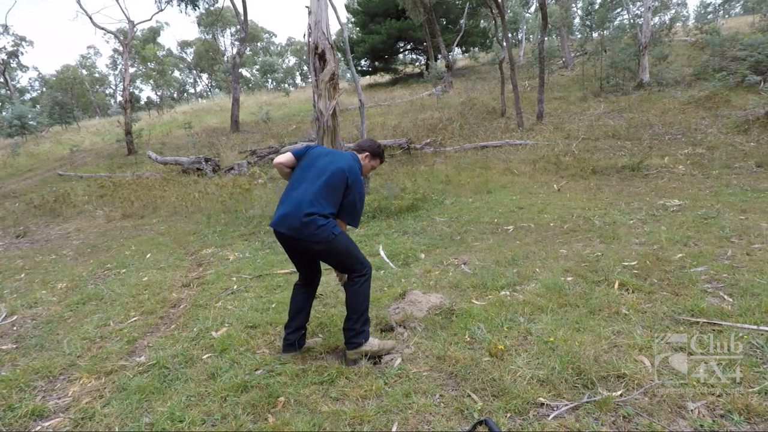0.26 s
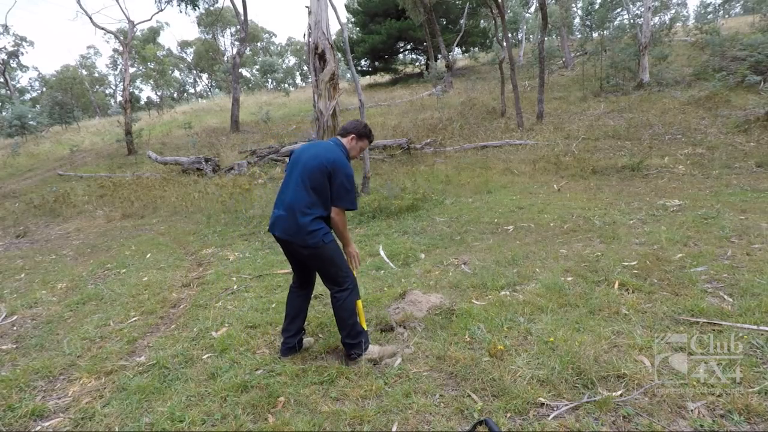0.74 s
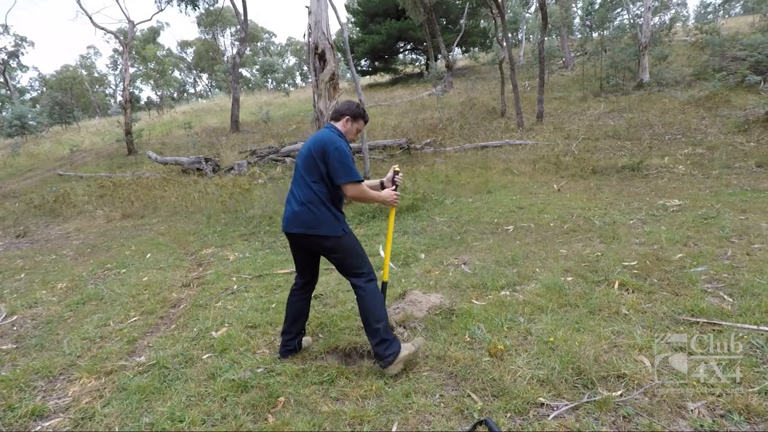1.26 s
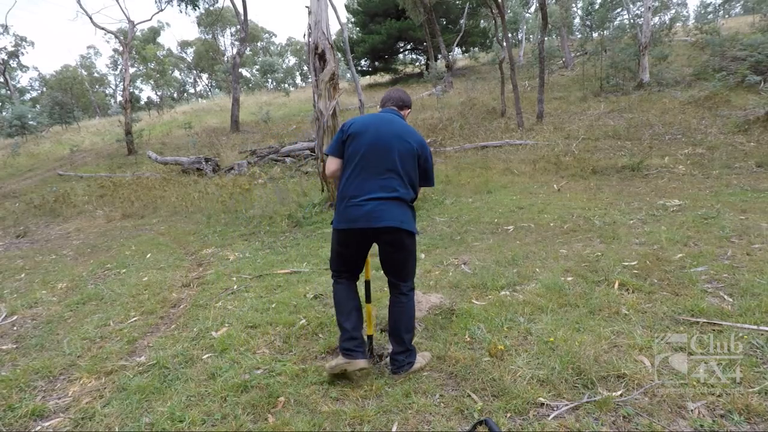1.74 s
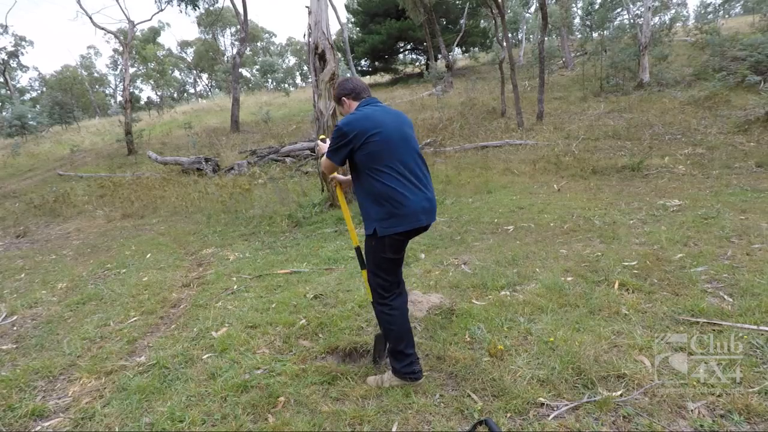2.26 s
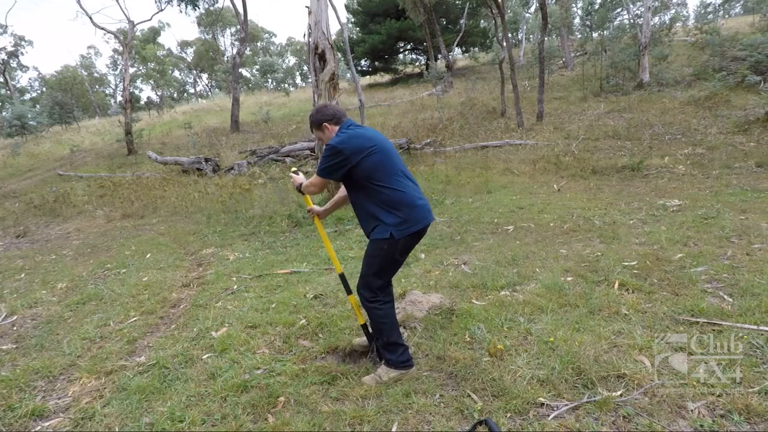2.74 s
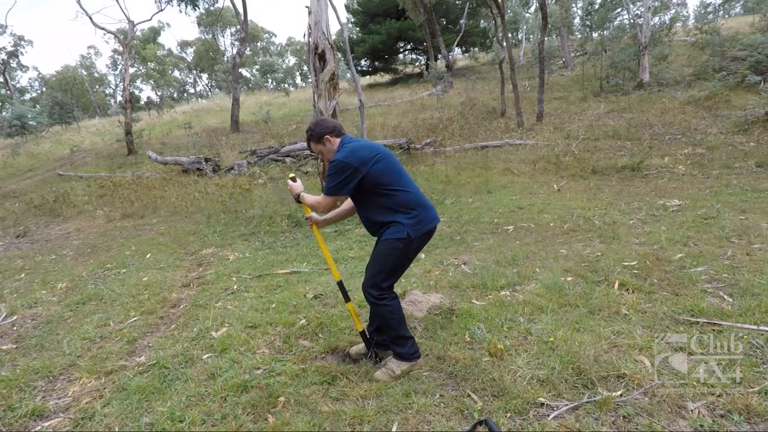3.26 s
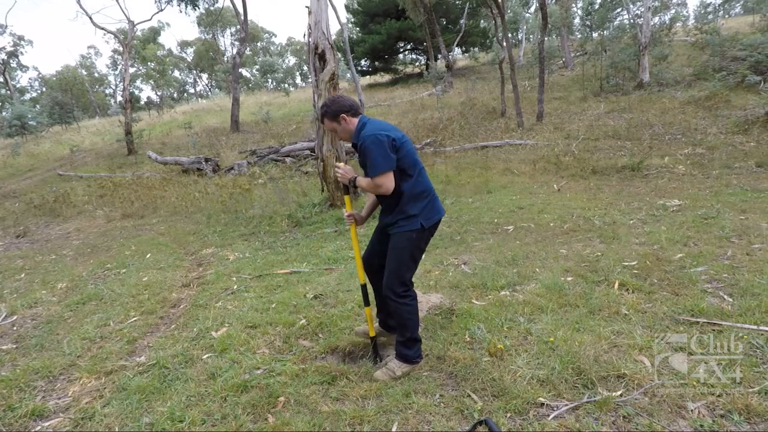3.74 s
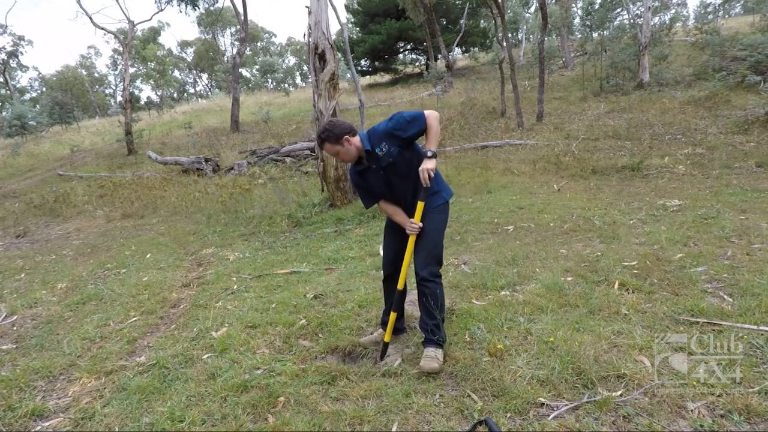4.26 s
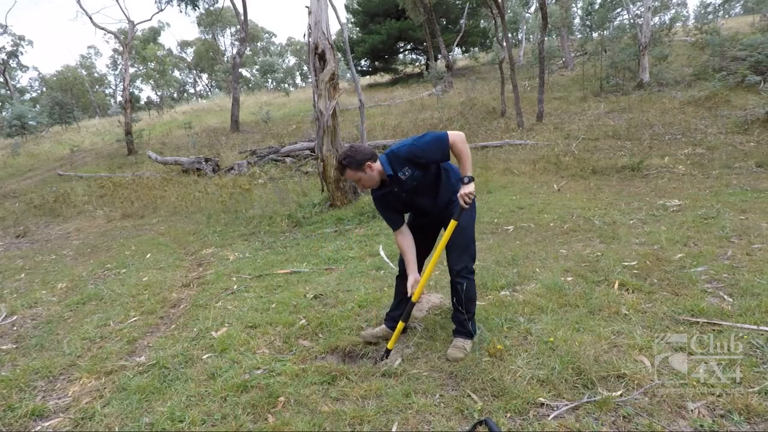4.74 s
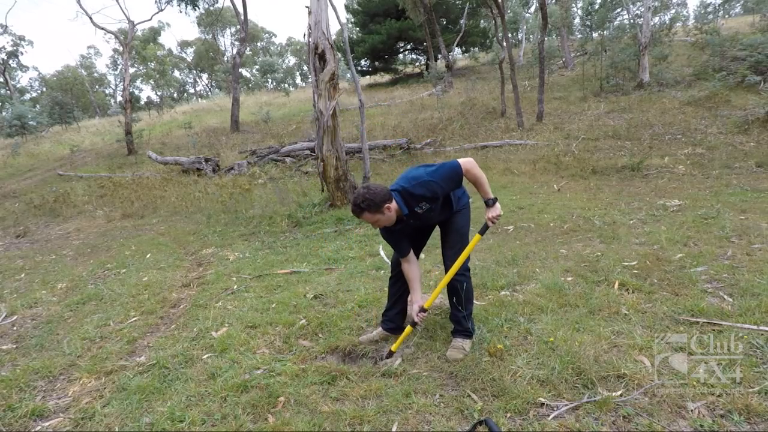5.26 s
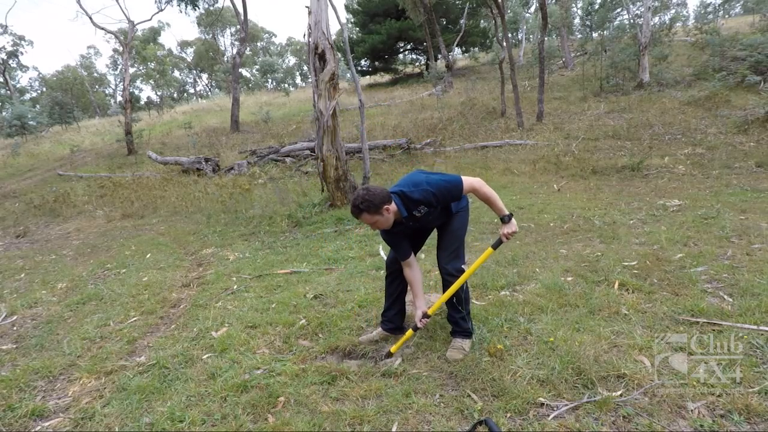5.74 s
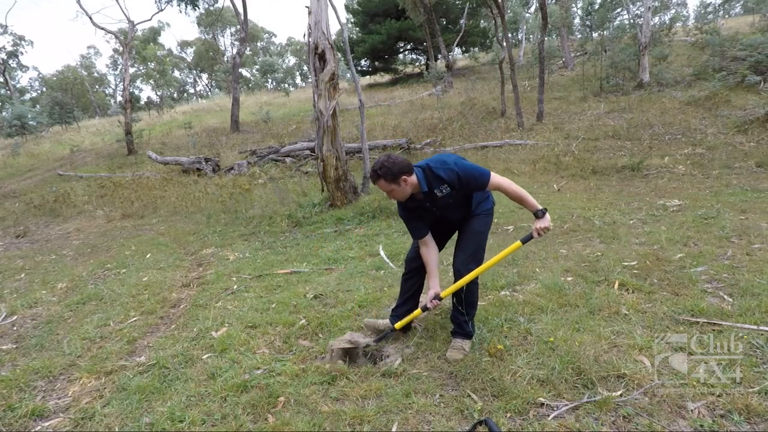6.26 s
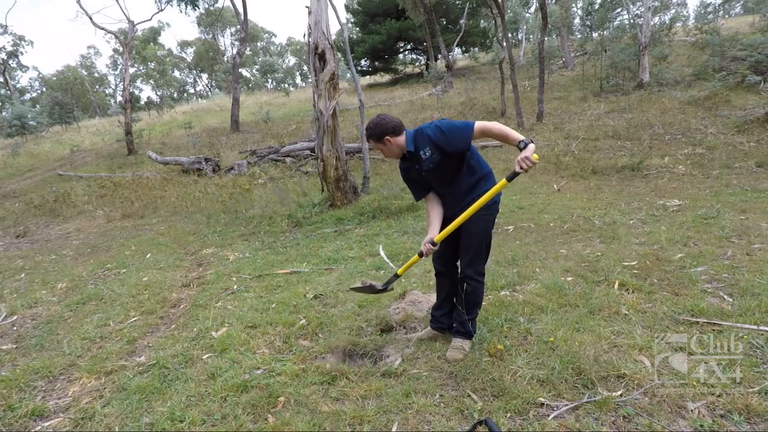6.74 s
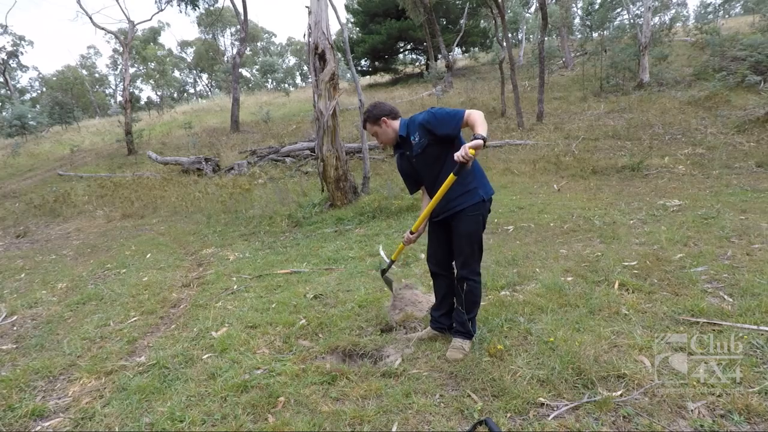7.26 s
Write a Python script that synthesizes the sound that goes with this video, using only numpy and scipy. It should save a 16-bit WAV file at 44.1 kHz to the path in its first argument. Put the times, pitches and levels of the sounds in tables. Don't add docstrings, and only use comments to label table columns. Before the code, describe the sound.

Outdoors, near the microphone, a boot drives a steel shovel into dry earth: crunch, knock and bright grit. Small stones tick on metal, the blade gives a short clean ring, and a dense crackling push follows. Later come isolated soft thuds, brushing stalks and dropping crumbs. Behind are steady air, a faint insect buzz, high whistled bird notes and a far low aircraft-like drone, with slight wind rumble.

```python
import sys
import numpy as np
from scipy import signal
from scipy.fft import rfft, irfft, next_fast_len
from scipy.io import wavfile
from scipy.ndimage import uniform_filter1d

SR = 44100
rng = np.random.default_rng(int(sys.argv[2]) if len(sys.argv) > 2 else 0)


def how_loud(loudness_db):
    steps = np.asarray(loudness_db, float) / 20
    return 10 ** steps


def transcribe(u):
    v = np.clip(np.atleast_2d(u).T, -1, 1)
    q = np.round(v * 32767).astype(np.int16)
    wavfile.write(sys.argv[1], SR, q)


N = 331191
SIZE = next_fast_len(N)
HZ = np.fft.rfftfreq(SIZE, 1 / SR)


def evened(x):
    return x / np.sqrt(np.mean(x ** 2) + 1e-20)


def read(points, hz, axis=1):
    columns = np.transpose(points)
    return np.interp(np.log(hz + 1), np.log(columns[0] + 1), columns[axis])


def follow(points):
    s, values = np.transpose(points)
    return np.interp(np.arange(N) / SR, s, values)


def add(mix, s, sound):
    part = mix[round(s * SR):][:len(sound)]
    part += sound[:len(part)]


def coloured(x, points):
    return evened(irfft(rfft(x, SIZE) * how_loud(read(points, HZ)), SIZE)[:N])


def band(x, lo_hz, hi_hz):
    return evened(signal.sosfilt(signal.butter(3, [lo_hz, hi_hz], "bandpass", fs=SR, output="sos"), x))


def resonate(x, hz, width):
    turn = np.exp(2j * np.pi * np.cumsum(hz * np.ones(len(x))) / SR)
    r = np.exp(-np.pi * width / SR)
    return 2 * (turn * signal.lfilter([1 - r], [1, -r], x / turn)).real


def grains(per_s, spread_db):
    size = how_loud(spread_db * np.minimum(rng.exponential(1, N), 4)) * rng.standard_normal(N)
    return evened(size * (rng.random(N) < per_s / SR))


def drift(per_s):
    span = round(SR / per_s)
    return evened(uniform_filter1d(uniform_filter1d(rng.standard_normal(N), span), span))


def patchy(x, depth_db):
    z = signal.stft(x, nperseg=256)[2]
    patches = rng.standard_normal(z.shape[::-1]).T
    patches = uniform_filter1d(uniform_filter1d(patches, size=5, axis=0), size=9, axis=1)
    return evened(signal.istft(z * how_loud(depth_db * evened(patches)), nperseg=256)[1][:N])


def strokes(table, roundness):
    s, db, swell, dying = np.transpose(table)[:4, :, None]
    late = np.arange(0, N, 64) / SR - s
    flank = np.where(late < 0, -late / np.maximum(swell, .005), late / np.maximum(dying, .005))
    return how_loud(db - 20 * np.minimum(flank, 50) ** roundness)


def summed(gains, rest_db):
    total = np.sqrt((gains ** 2).sum(0) + how_loud(rest_db) ** 2)
    return np.interp(np.arange(N), np.arange(0, N, 64), total)


def soft_pulse(db, hz, length, skew):
    t = np.arange(0, max(length, 1.5 / hz), 1 / SR)
    u = t / t[-1]
    peak_s = t[-1] * .5 ** (1 / skew)
    swell = np.sin(np.pi * u ** skew) ** 2
    return how_loud(db) * swell * np.cos(2 * np.pi * hz * (t - peak_s)), peak_s


def air():
    # (frequency [Hz], level [dB per Hz])
    wash_colour = [(65, -47.5), (110, -36), (132, -37), (162, -13), (180, -4), (225, -16.5), (392, -18),
                   (603, -19), (1050, -34), (1450, -34.5), (3890, -50.5), (6490, -49), (9780, -48.5),
                   (12200, -59.5), (14700, -73)]
    # (frequency [Hz], likeness [-1 to 1])
    likeness = [(60, 0.26), (180, 1), (540, 0.63), (1600, -0.62), (4780, 0.77), (14300, -0.53)]
    # (frequency [Hz], left minus right [dB])
    tilt = [(60, -0.5), (240, -1.5), (930, -3), (3640, 2), (14300, -6.5)]
    frames, hz = N // 256 + 5, np.fft.rfftfreq(1024, 1 / SR)
    a, b, c, d, patches = rng.standard_normal((frames, 513, 5)).T
    patches = evened(uniform_filter1d(uniform_filter1d(patches, 12, 0), 14, 1))
    same = np.clip(read(likeness, hz), -1, 1)[:, None]
    left = a + 1j * b
    right = same * left + np.sqrt(1 - same ** 2) * (c + 1j * d)
    side_db = np.array([.5, -.5])[:, None, None] * read(tilt, hz)[:, None]
    z = np.array([left, right]) * how_loud(read(wash_colour, hz)[:, None] + 0.29 * patches + side_db)
    return how_loud(-48.5) * evened(signal.istft(z, nperseg=1024, noverlap=768)[1][:, :N])


def insect():
    buzz = evened(resonate(rng.standard_normal(N), 3300 + 70 * drift(per_s=4), width=110))
    pulses = how_loud(3.0 * drift(per_s=30))
    return how_loud(-81) * buzz * pulses * np.clip(np.arange(N) / SR - 3.5, .3, 1.2)


def wind():
    # (time [s], level [dB])
    gust_level = [(0.0, -57), (0.14, -78), (1.5, -65), (3.0, -78.5), (7.51, -80)]
    gust = band(rng.standard_normal(N), 11, 90)
    own = band(rng.standard_normal(N), 45, 115)
    return how_loud(follow(gust_level)) * (gust + .3 * own * np.array([[1], [-1]]))


def drone():
    # (time [s], frequency [Hz])
    pitch = [(0, 164), (.2, 168.2), (.75, 167.9), (1.1, 165.4), (2.2, 165), (2.6, 161.5), (3.1, 160.2),
             (4.3, 160), (4.7, 157.6), (5.8, 157.4), (6.05, 155.1), (7.51, 154.4)]
    # (time [s], level [dB])
    loudness = [(0.0, -53), (0.35, -33), (0.52, -24.5), (0.575, -29.5), (0.615, -23), (0.73, -26),
                (1.12, -43), (2.16, -41.5), (2.6, -51), (2.96, -47), (3.14, -37), (3.8, -41), (3.87, -49),
                (4.39, -45), (4.58, -40.5), (4.984, -33.5), (5.49, -33.5), (5.8, -39), (6.3, -36),
                (7.51, -44.5)]
    # (time [s], level [dB])
    firing = [(0.0, -75.5), (1.0, -62), (2.3, -73.5), (3.0, -79), (3.5, -74), (5.2, -72), (5.8, -79),
              (6.5, -91), (7.0, -83), (7.51, -80)]
    hz, db, half_db = follow(pitch), follow(loudness), follow(firing)
    turns = np.cumsum(hz) / SR
    blur = evened(resonate(resonate(rng.standard_normal(N), hz, width=28), hz, width=21.0))
    tone = np.sqrt(2) * np.sin(2 * np.pi * turns) + 0.12 * blur
    half = np.sin(np.pi * turns) * how_loud(half_db)
    third = np.sin(3 * np.pi * turns) * how_loud((db + half_db) / 2 - 4.5)
    return tone * how_loud(db) + how_loud(-52.5) * blur + np.sqrt(2) * (half + third)


def bird():
    # (start [s], peak level [dB], middle frequency [Hz])
    notes = [(0.522, -63, 7940), (0.594, -66, 8000), (0.65, -65, 8020), (0.697, -67.5, 8150),
             (0.762, -64.5, 7900), (3.0717, -61, 7950), (3.1353, -61, 7820), (3.2071, -60, 7700),
             (5.2649, -59, 7620), (5.517, -58, 8600), (5.5744, -54.5, 8380), (5.6344, -55, 8220),
             (5.6885, -55, 8110), (5.7428, -55, 8000), (5.7844, -56, 7840), (5.8344, -55, 7840),
             (6.18, -63, 7950), (6.2494, -64, 8340), (6.32, -62, 8300), (6.402, -62, 8200),
             (6.4582, -65, 8000), (6.5, -65, 7900), (6.5545, -59, 7750)]
    out, u = np.zeros(N), np.linspace(0, 1, 1000)
    for s, db, hz in notes:
        fall_hz = 350 + 1.0 * max(hz - 7700, 0)
        glide_hz = hz + fall_hz * (.5 - u) - 450 * u ** 5
        whistle = np.sin(2 * np.pi * np.cumsum(glide_hz) / SR)
        add(out, s, how_loud(db - 7.5) * np.sin(np.pi * u) * whistle)
    return out


def rustles():
    # (middle [s], level [dB], frequency [Hz])
    swishes = [
        (3.3, -67.5, 6900),
        (3.56, -65, 6900),
        (4.65, -60, 7200),
        (5.29, -75, 7160),
        (3.88, -66, 6250),
        (4.13, -64, 6360),
        (4.43, -69, 6740),
        (4.728, -55.5, 6600),
        (5.01, -64.5, 6364),
    ]
    out = np.zeros(N)
    for (s, db, hz), noise in zip(swishes, rng.standard_normal((len(swishes), 4000))):
        swish = evened(resonate(resonate(noise, hz, width=910), hz, width=910))
        add(out, s - 2000 / SR, how_loud(db) * swish * np.hanning(4000))
    return out


def blade():
    # (start [s], frequency [Hz], level [dB], time to fade 60 dB [s], stopped at [s])
    rings = [
        (2.094, 2093, -52, 1.1, 2.26),
        (2.096, 2690, -48.5, .2, 2.19),
        (2.1, 2825, -49.5, .2, 2.19),
        (2.15, 6440, -63, 1.5, 2.3),
        (2.012, 7450, -50, .4, 2.055),
        (2.105, 7450, -53, .2, 2.17),
        (1.9, 1310, -70, 1.5, 2.05),
    ]
    out = np.zeros(N)
    for s, hz, db, t60, stop in rings:
        t = np.arange(0, stop - s, 1 / SR)
        beat = 1 + hz / 9000 * np.cos(2 * np.pi * hz / 550 * t)
        fade = how_loud(db - 60 * t / t60) * signal.windows.tukey(len(t), .1)
        add(out, s, fade * beat * np.sin(2 * np.pi * hz * t))
    return out


def ticks():
    # (time [s], peak level [dB], frequency [Hz])
    stones = [(0.3585, -33, 6460), (0.998, -38, 5650), (1.223, -40.5, 5670), (1.7932, -38, 6320),
              (1.8425, -41, 4200), (2.098, -20.5, 6900), (2.314, -46, 6900), (2.364, -41, 6350),
              (2.6208, -34, 6600), (2.65, -13.5, 6820), (2.7237, -18, 7300), (2.7953, -11.5, 7200),
              (3.038, -41.5, 3400), (3.455, -36, 4700), (3.493, -34.5, 6950), (4.041, -40, 7450),
              (4.048, -36, 7160), (2.706, -21, 6800), (2.803, -28, 7100), (2.005, -28, 6600),
              (0.061, -30, 5420), (0.129, -27, 5440), (0.381, -25, 6060), (0.413, -27, 6340),
              (2.679, -31, 4000), (2.858, -25, 3460)]
    out, t = np.zeros(N), np.arange(300) / SR
    shape = how_loud(-60 * t / .007) * np.minimum(t * 1500, 1)
    for (s, db, hz), noise in zip(stones, rng.standard_normal((len(stones), 300))):
        crack = band(band(noise, 2200, 7400), 1400, 7800)
        add(out, s, how_loud(db - 3.0) * shape * (0.57 * crack + 0.62 * np.sin(2 * np.pi * hz * t)))
    return out


def scraping():
    # (peak [s], coarse grit level [dB], swell
    # [s], dying [s], fine against coarse grit [dB])
    grit_strokes = [(0.075, -43.5, 0.4, 0.098, -6), (0.15, -42, 0.066, 0.053, -2.5),
                    (0.368, -42.5, 0.028, 0.12, 1), (0.41, -41.5, 0.052, 0.066, 3.5),
                    (2.008, -49.5, 0.036, 0.26, -4.5), (2.06, -45, 0.088, 0.032, -5),
                    (2.101, -36.5, 0.017, 0.028, -11.5), (2.316, -59.5, 0.012, 0.047, 4),
                    (2.365, -53.5, 0.074, 0.017, 3), (2.636, -41.5, 0.022, 0.13, 3),
                    (2.72, -37.5, 0.051, 0.087, 3.5), (2.796, -42, .15, 0.14, 2.5), (2.905, -55, 0.34, 0.04, 4),
                    (1.0, -66.5, 0.025, 0.43, -5), (1.225, -70, 0.057, 0.054, -14),
              (3.45, -59.5, 0.019, 0.15, -1), (3.495, -70, 0.078, 0.64, -1), (4.654, -69, 0.072, 0.16, -6),
              (4.724, -73, 0.19, 0.041, 14), (5.1, -73, 0.79, 0.16, 2), (5.438, -55, 0.035, 0.031, -2),
              (5.64, -72, 0.043, 0.089, 7), (5.873, -57.5, 0.014, 0.084, -12),
              (5.923, -57.5, 0.077, 0.014, -15), (6.605, -74, 0.071, 0.083, 8.5),
              (7.15, -73.5, 0.037, 0.11, 3), (7.288, -69, 0.037, 0.055, 2)]
    # (peak [s], level [dB], swell [s], dying [s])
    tears = [(0.06, -46, .4, 0.12), (0.145, -43.5, 0.087, 0.061), (0.405, -35.5, 0.055, 0.085),
             (0.46, -51.5, 0.15, 0.048), (1.0, -62, 0.047, 0.41), (2.02, -59, .04, .15),
             (2.103, -53, 0.034, 0.092), (2.649, -47, .03, .12), (2.72, -43, 0.12, 0.15),
             (2.8, -36.5, 0.13, 0.13), (2.9, -50, 0.18, 0.043), (3.45, -63, 0.044, 0.21),
             (3.495, -43.5, 0.016, 0.014), (4.654, -58, 0.087, 0.17), (5.18, -60.5, 0.31, 0.04),
             (5.438, -50, 0.056, 0.033), (5.872, -57, .02, 0.11), (5.925, -57, 0.091, 0.024),
             (6.605, -70, 0.25, 0.22), (7.2, -67, 0.2, 0.56)]
    # (frequency [Hz], level [dB per Hz])
    grit_colour = [(1530, -40), (2600, -40), (2950, -10), (3450, -1.5), (3900, -6.5), (4450, -3),
                   (5400, -2.5), (5980, -7), (6630, -1), (7610, -1.5), (9300, -22), (10500, -60),
                   (14300, -51), (22000, -120)]
    # (frequency [Hz], width [Hz], level [dB])
    resonances = [(2090, 28, -5), (2250, 60, -8), (3400, 120, -7), (4310, 110, -12), (4870, 110, -9),
                  (5500, 90, -4), (5700, 29, -8), (6250, 15, -6), (6440, 40, -3), (6690, 160, 0),
                  (7430, 30, -1), (7830, 38, -14)]
    free_s = (1.96, 1.98, 2.40, 2.45)
    roundness = 1.5
    rubs = grit_strokes
    gains, fineness_db = strokes(rubs, roundness), np.transpose(rubs)[4][:, None]
    fine_gain = summed(gains * how_loud(fineness_db), rest_db=-75.5)
    coarse_gain = summed(gains, rest_db=-78)
    roots_gain = summed(strokes(tears, roundness), rest_db=-73)

    clumps = how_loud(1.8 * drift(per_s=120))
    slips = grains(per_s=9000, spread_db=1.5) * clumps
    modes = sum(how_loud(db) / (1 + 2j * (HZ - hz) / (width + 20)) for hz, width, db in resonances)
    steel = evened(irfft(rfft(slips, SIZE) * modes, SIZE)[:N])
    free = np.interp(np.arange(N) / SR, free_s, [.55, 2.8, 2.8, .55])
    grit = patchy((coloured(slips, grit_colour) + free * steel) / np.sqrt(1 + free ** 2), depth_db=2.3)
    fine = band(band(grit, 6220, 10600), 5400, 9700)
    coarse = band(grit, 2700, 5650)

    fibres = patchy(grains(per_s=3000, spread_db=2.5) * clumps, depth_db=1.8)
    roots = band(fibres + (free - .4) * steel, 1000, 2800)
    roots = roots + how_loud(-25) * band(slips, 9000, 14500)
    grit_sound = how_loud(-1.0) * fine_gain * fine + how_loud(-0.15) * coarse_gain * coarse
    return grit_sound + how_loud(-8.0) * roots_gain * roots


def digging():
    # (peak [s], level [dB], swell [s], dying [s], clod frequency [Hz])
    crumbles = [(0.043, -28, 0.052, 0.16, 415), (0.165, -29.5, 0.32, 0.075, 508),
                (0.365, -15.5, 0.011, 0.078, 514), (0.419, -20.5, 0.031, 0.098, 290),
                (0.47, -25.5, 0.081, 0.024, 390), (0.8, -45, 0.86, 0.23, 264),
                (1.117, -32, 0.21, 0.19, 428), (1.232, -33.5, 0.18, 0.055, 393),
                (2.06, -35, 0.1, 0.041, 461), (2.12, -34.5, 0.17, 0.056, 597),
                (2.355, -45, 0.25, 0.15, 443), (2.617, -25.5, 0.0098, 0.18, 370),
                (2.77, -24, 0.12, 0.23, 519), (2.856, -14.5, 0.19, 0.03, 545),
                (2.913, -20.5, 0.18, 0.012, 528), (3.485, -33.5, 0.073, 0.057, 520),
                (3.62, -35, 0.22, 0.051, 318), (4.2, -39, 0.52, 0.56, 271),
                (4.639, -31.5, 0.091, 0.16, 360), (5.176, -35.5, 0.33, 0.037, 335),
                (5.435, -31.5, 0.043, 0.032, 610), (3.3, -44.5, .2, 0.17, 604),
                (5.92, -37, 0.083, 0.033, 714), (6.677, -41, 0.2, 0.036, 421)]
    # (frequency [Hz], level [dB per Hz])
    soil_colour = [(59, -71.5), (100, -13), (161, 4.5), (258, -2), (496, -5.5), (623, -1), (834, -8),
                   (916, -16.5), (1200, -21), (1560, -83), (2640, -120)]
    settling_db, settling_hz = -56.5, 287
    gains = strokes(crumbles, roundness=1.82)
    pitches = np.transpose(crumbles)[4][:, None]
    soil_gain = summed(gains, settling_db)
    pitched_gain = summed(gains * np.sqrt(pitches / settling_hz), settling_db)
    clod_hz = settling_hz * (pitched_gain / soil_gain) ** 2
    breaks = grains(per_s=1500, spread_db=1.6)
    hollow = evened(resonate(resonate(breaks, clod_hz, width=400), clod_hz, width=400))
    return how_loud(-7.0) * soil_gain * (coloured(hollow, soil_colour) + 0.56 * coloured(breaks, soil_colour))


def knocks():
    # (peak [s], peak level [dB], frequency [Hz], length [s])
    thuds = [(0.044, -27.5, 311, 0.029), (0.087, -23, 345, 0.012), (0.145, -24, 373, 0.013),
             (0.168, -30, 352, 0.018), (0.385, -24, 342, 0.0053), (0.392, -17, 300, 0.032),
             (0.397, -8.5, 300, 0.014), (0.419, -16, 268, 0.021), (0.443, -23.5, 303, 0.0089),
             (0.469, -26.5, 308, 0.013), (0.489, -30.5, 285, 0.012), (1.12, -32.5, 330, 0.086),
             (1.229, -28, 357, 0.028), (2.063, -26.5, 322, 0.015), (2.618, -17.5, 293, 0.0059),
             (2.62, -22.5, 332, 0.019), (2.625, -34, 346, 0.069), (2.65, -20, 332, 0.0079),
             (2.708, -22, 356, 0.019), (2.741, -19, 342, 0.011), (2.762, -22, 289, 0.02),
             (2.774, -14, 321, 0.0093), (2.799, -16, 337, 0.02), (2.812, -24, 287, 0.024),
             (2.834, -19.5, 263, 0.021), (2.859, -14, 287, 0.019), (2.879, -27, 312, 0.027),
             (2.89, -25, 300, 0.024), (2.93, -27, 264, 0.034), (3.482, -26, 260, 0.012),
             (4.594, -19.5, 356, 0.011), (4.617, -28, 230, 0.025), (4.636, -26, 285, 0.0068),
             (4.672, -28.5, 326, 0.03), (5.087, -25.5, 260, 0.0092), (5.094, -29, 292, 0.0068),
             (5.17, -22.5, 249, 0.0085), (5.419, -24, 205, 0.051), (5.444, -8.5, 250, 0.013),
             (5.643, -21, 226, 0.011), (5.877, -19.5, 225, 0.011), (5.891, -15, 238, 0.014),
             (5.904, -25, 230, 0.02), (5.917, -15.5, 242, 0.011), (5.927, -24.5, 252, 0.036)]
    # (peak [s], peak level [dB], frequency [Hz], length [s])
    clods = [(0.108, -25.5, 522, 0.02), (0.134, -22.5, 464, 0.02), (0.142, -22.5, 552, 0.016),
             (0.159, -23, 570, 0.0092), (0.165, -29, 590, 0.021), (0.18, -26, 504, 0.01),
             (0.354, -24, 534, 0.007), (0.363, -18.5, 500, 0.011), (0.376, -10, 554, 0.0067),
             (0.383, -15.5, 510, 0.0079), (0.393, -13, 494, 0.0083), (0.409, -20.5, 645, 0.013),
             (0.417, -25, 537, 0.019), (0.429, -29, 610, 0.0057), (0.435, -22, 524, 0.0063),
             (0.442, -23, 526, 0.007), (0.446, -28.5, 600, 0.016), (0.466, -28, 507, 0.012),
             (0.472, -29.5, 522, 0.0053), (1.113, -27, 584, 0.009), (1.845, -28, 564, 0.0071),
             (2.06, -22.5, 550, 0.0079), (2.617, -15.5, 446, 0.0087), (2.709, -25.5, 587, 0.028),
             (2.722, -21, 554, 0.0045), (2.729, -19, 519, 0.0077), (2.737, -18.5, 502, 0.01),
             (2.743, -35, 553, 0.0064), (2.75, -28, 553, 0.0081), (2.755, -19.5, 517, 0.0037),
             (2.761, -18, 660, 0.011), (2.774, -25, 553, 0.006), (2.784, -17, 548, 0.0052),
             (2.798, -7.5, 530, 0.0058), (2.817, -19.5, 580, 0.0066), (2.822, -23, 552, 0.02),
             (2.832, -24, 616, 0.0066), (2.845, -14.5, 603, 0.0074), (2.859, -13, 620, 0.018),
             (2.87, -33, 590, 0.0068), (2.888, -19, 615, 0.0073), (2.901, -18, 596, 0.0085),
             (2.912, -20, 570, 0.0089), (2.923, -20, 616, 0.012), (3.481, -26, 586, 0.0065),
             (4.637, -29, 535, 0.0034), (5.423, -28.5, 650, 0.0066), (5.43, -42, 640, 0.013)]
    # (peak [s], peak level [dB], frequency [Hz], length [s])
    snaps = [(0.396, -34.5, 960, 0.0043), (.402, -38.5, 1000, .009), (.414, -38.5, 1036, .011),
             (.424, -42.5, 930, .01), (1.227, -33.5, 770, 0.007), (2.05, -45, 955, 0.016),
             (2.074, -52, 1134, 0.077), (2.797, -27.5, 820, 0.014), (2.841, -36, 905, 0.0097),
             (2.859, -30.5, 855, 0.0085), (5.428, -40, 863, 0.013), (5.435, -40, 980, 0.0054),
             (5.439, -36.5, 935, 0.0048), (5.635, -44.5, 870, 0.0087), (5.72, -56, 1040, 0.009),
             (5.864, -42.5, 860, 0.011), (5.876, -43.5, 910, 0.014), (5.89, -42.5, 1020, 0.0077),
             (5.902, -45, 895, 0.019), (5.908, -41, 910, 0.0045), (5.916, -42, 897, 0.0071),
             (5.925, -37.5, 940, .006)]
    # (peak [s], peak level [dB], frequency [Hz], length [s])
    further_thuds = [
        (2.168, -32, 208, 0.033),
        (3.6, -39.5, 328, 0.19),
        (5.46, -14, 228, 0.019),
        (5.478, -26.5, 217, 0.013),
        (5.956, -34, 233, 0.029),
    ]
    # (start [s], peak level [dB], frequency [Hz])
    lumps = [(0.251, -40.5, 550), (0.337, -34, 506), (0.943, -39.5, 520), (1.053, -32.5, 625),
             (1.543, -42.5, 570), (3.445, -54, 484), (4.049, -33.5, 630), (4.177, -56, 592),
             (4.592, -42, 550), (5.881, -33, 616), (6.469, -41.5, 630), (6.535, -42, 634),
             (6.565, -41, 620), (6.673, -48, 480)]
    lump_s = 0.01073
    drops = [(s + lump_s / 3, db, hz, lump_s) for s, db, hz in lumps]
    out = np.zeros(N)
    for s, db, hz, length in thuds + clods + snaps + further_thuds + drops:
        pulse, peak_s = soft_pulse(db, hz, length, skew=.8)
        add(out, max(s - peak_s, 0), pulse)
    return signal.sosfilt(signal.butter(2, 1600, fs=SR, output="sos"), out)


def ports(x):
    # (frequency [Hz], left minus right [dB], left leads by [radians])
    differences = [(110, 0, 0.), (370, -3, 0.), (690, -6.5, .25), (900, -5, 1.4), (1400, -3, 1.9),
                   (2050, -1, .8), (2600, -2, 0.), (4400, 1, -.15), (5200, 6, -1.4), (6100, -5, -2.2),
                   (6800, -17, -.8), (7500, -13, .2), (8500, -6, .3), (9500, -2, .1)]
    half = how_loud(read(differences, HZ) / 2) * np.exp(.5j * read(differences, HZ, axis=2))
    pair = np.array([half, 1 / half])
    return irfft(rfft(x, SIZE) * pair / abs(pair.mean(0)), SIZE)[:, :N]


def field(x):
    t = np.arange(3000) / SR
    taps = rng.standard_normal((2, 3000)) * how_loud(-60 * t / .06) * (t > .003)
    taps = signal.sosfilt(signal.butter(2, 500, "highpass", fs=SR, output="sos"), taps)
    return signal.oaconvolve(x[None], taps / np.linalg.norm(taps[0]), axes=1)[:, :N]


def bass_cut(x):
    return irfft(rfft(x, SIZE) / np.sqrt(1 + (145 / (HZ + 1)) ** 16), SIZE)[..., :N]


def scene():
    shovel = digging() + scraping() + knocks() + ticks() + blade() + rustles()
    near = ports(shovel) + how_loud(-9.0) * field(shovel)
    far = drone() * how_loud([[-.4], [.4]]) + bird() * how_loud([[-1.5], [1.5]])
    return bass_cut(near + air() + insect()) + far + wind()


def roll_off(x):
    return signal.sosfilt(signal.butter(12, 14600, fs=SR, output="sos"), x)


def record(dry):
    hiss = how_loud(-80.5) * band(rng.standard_normal((2, N)), 9500, 15500)
    return roll_off(dry + hiss)


dry = scene()
out = record(dry)
transcribe(out)
```